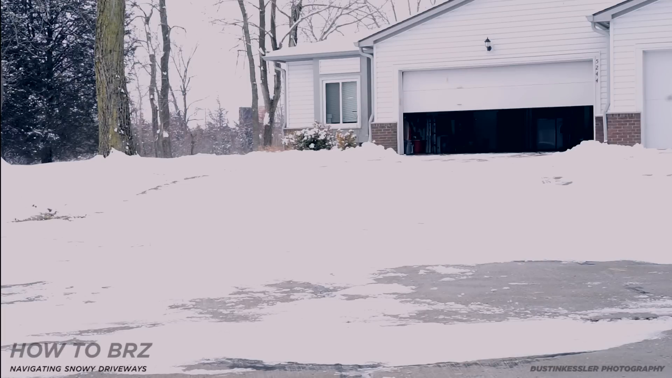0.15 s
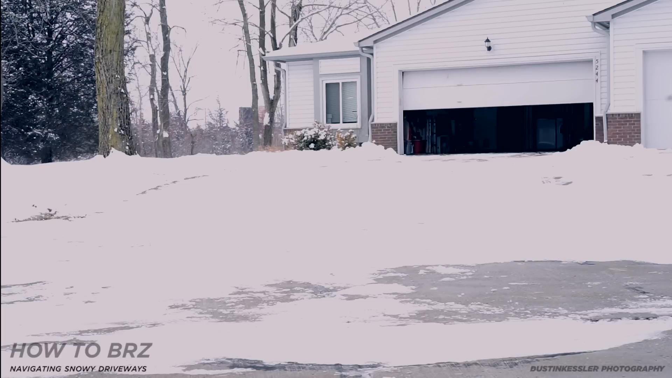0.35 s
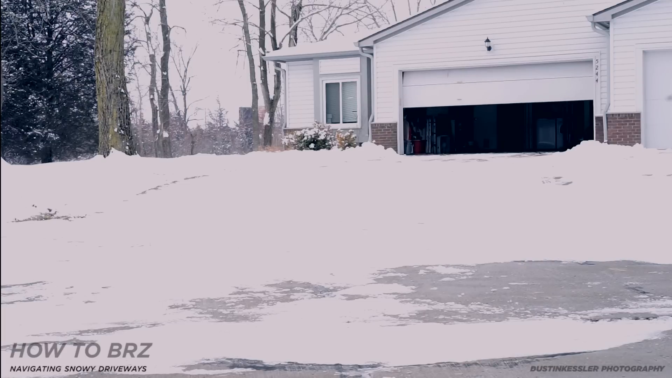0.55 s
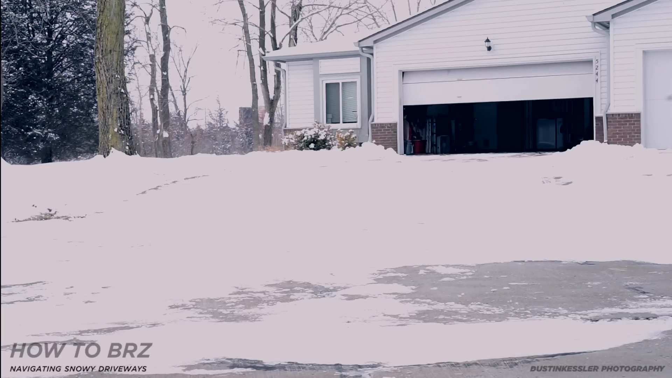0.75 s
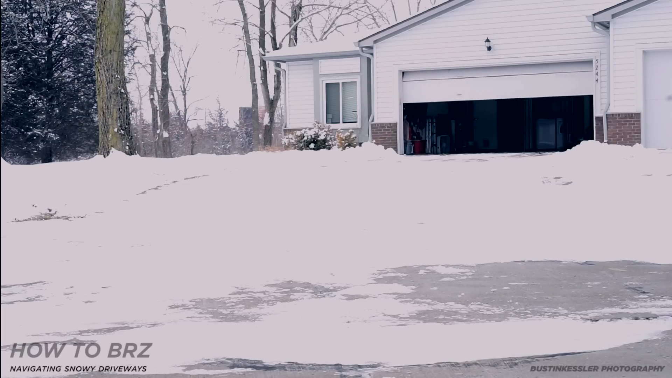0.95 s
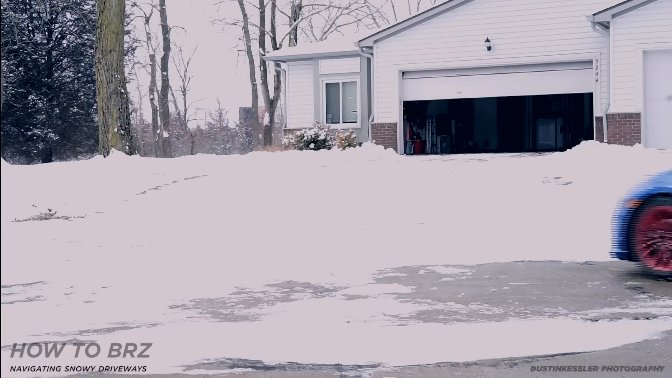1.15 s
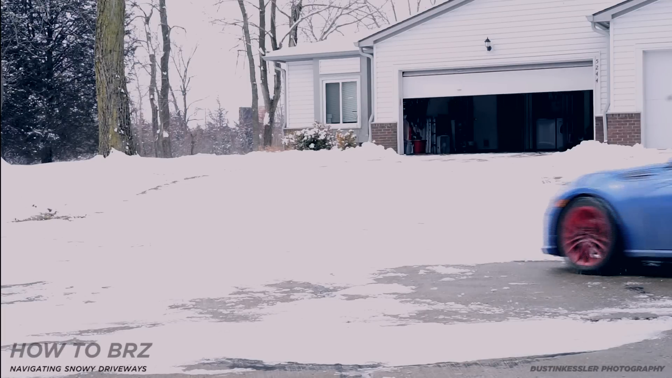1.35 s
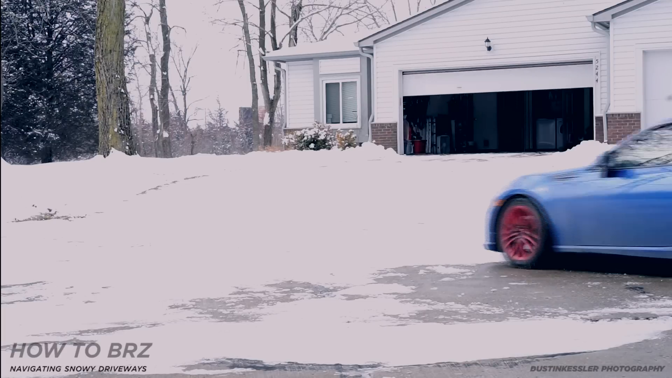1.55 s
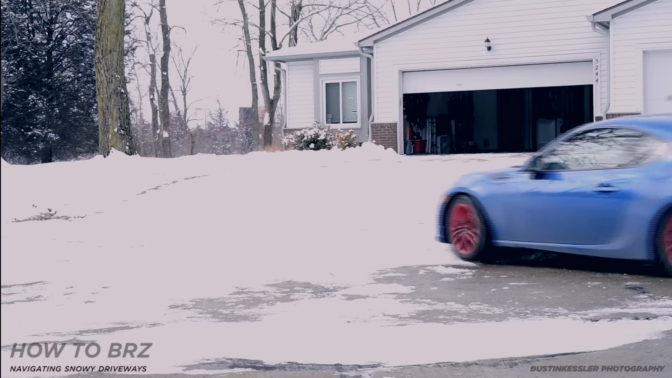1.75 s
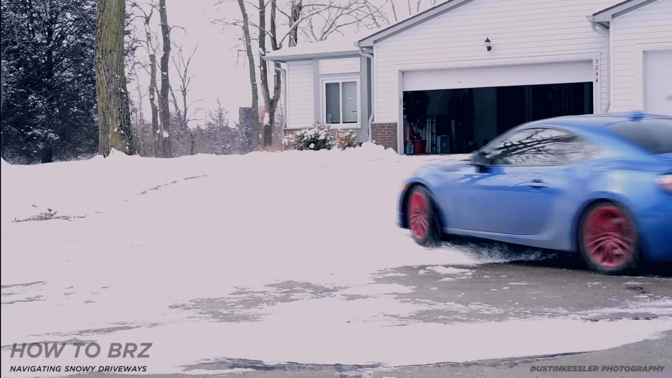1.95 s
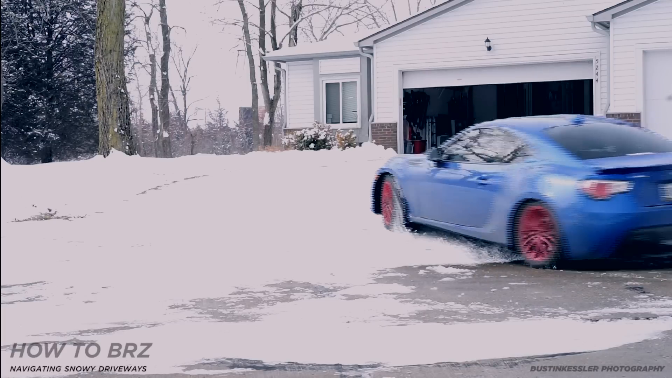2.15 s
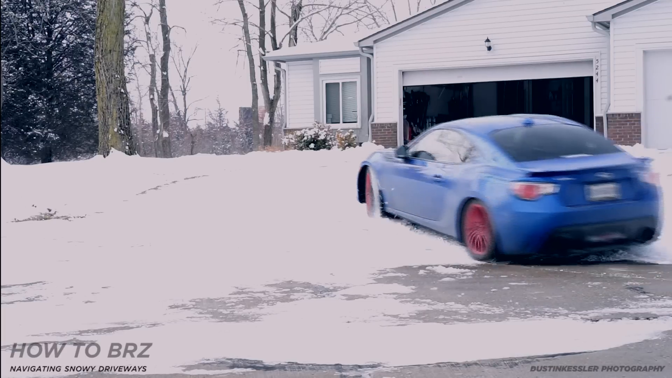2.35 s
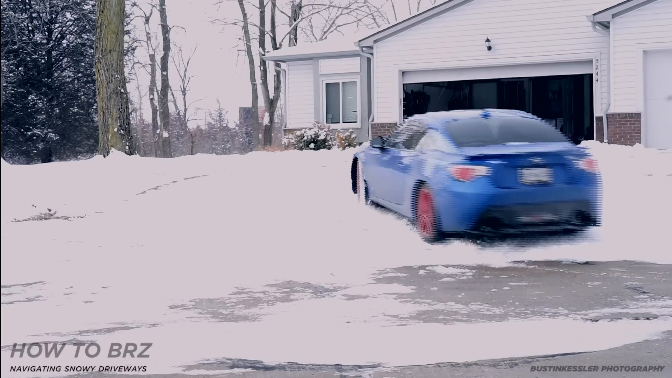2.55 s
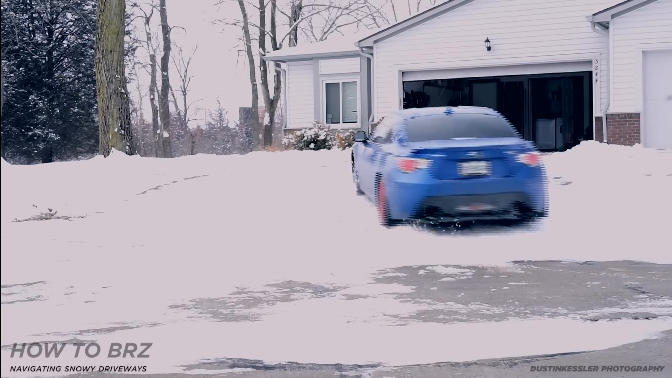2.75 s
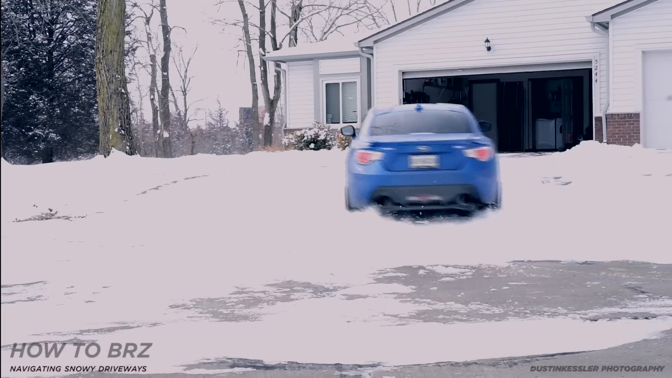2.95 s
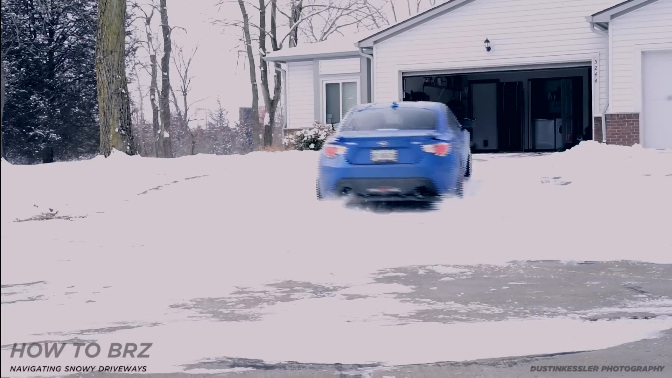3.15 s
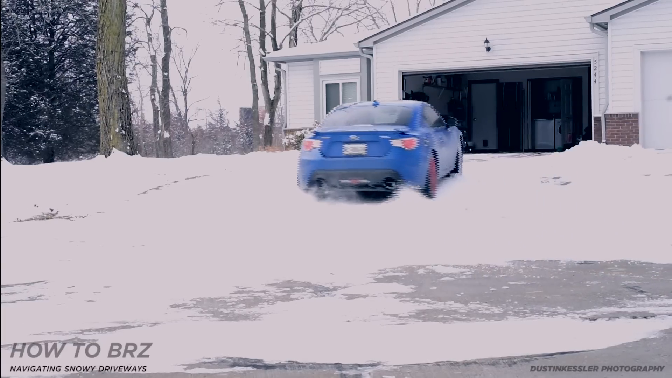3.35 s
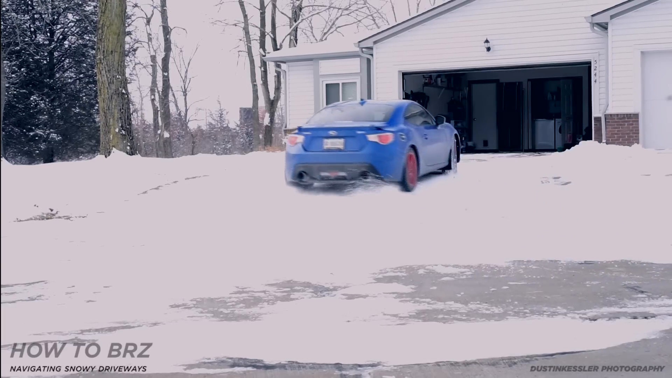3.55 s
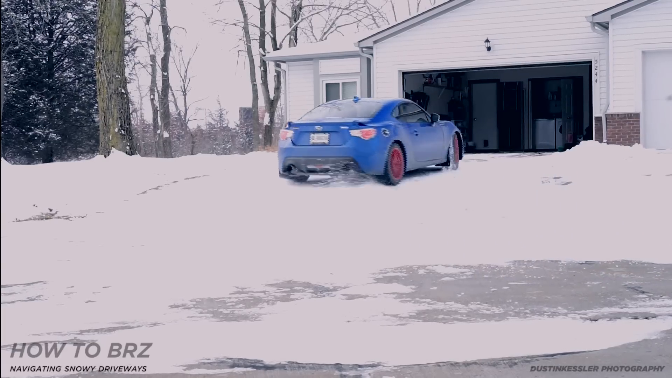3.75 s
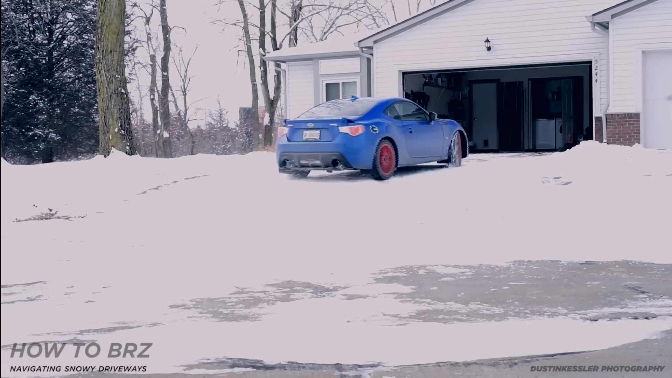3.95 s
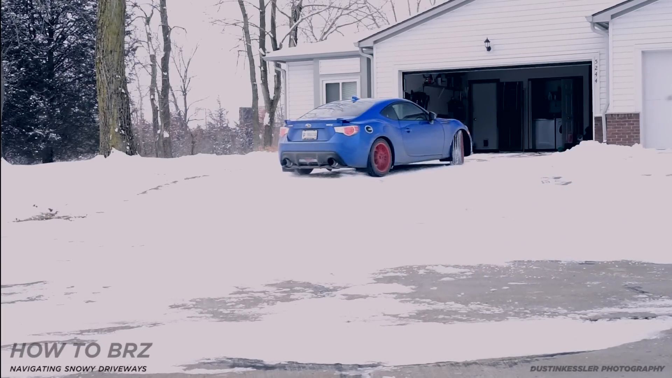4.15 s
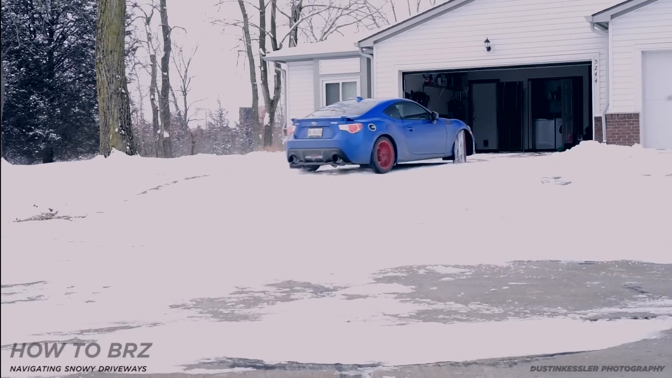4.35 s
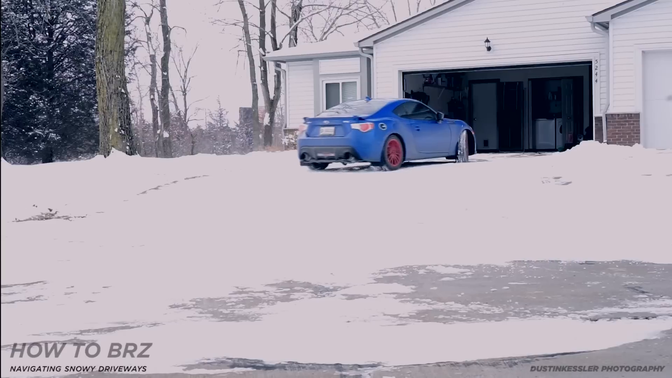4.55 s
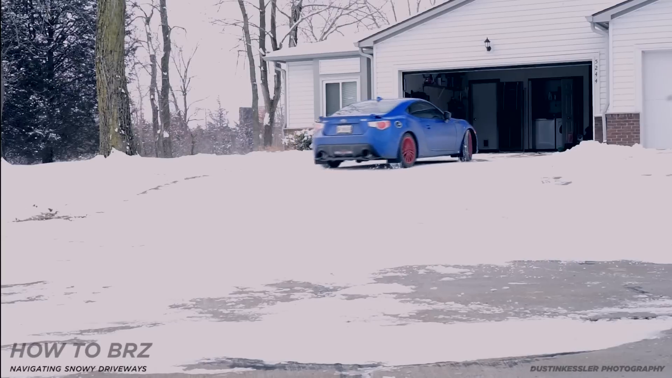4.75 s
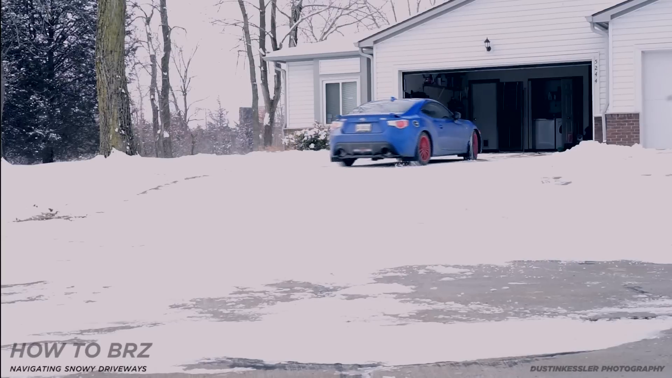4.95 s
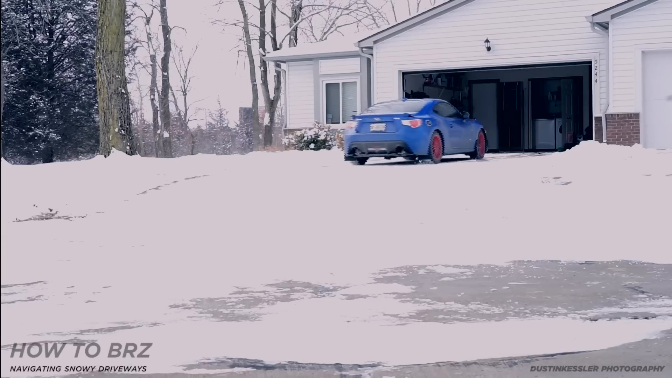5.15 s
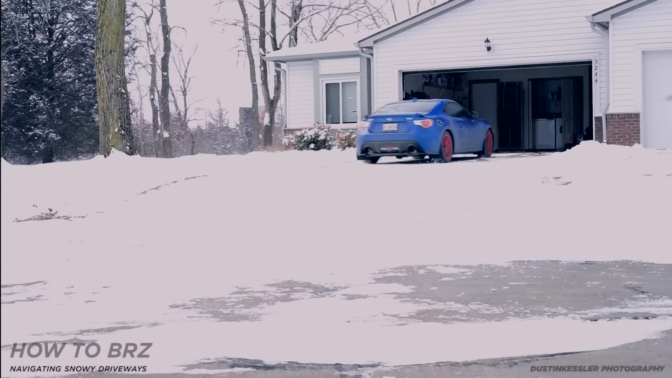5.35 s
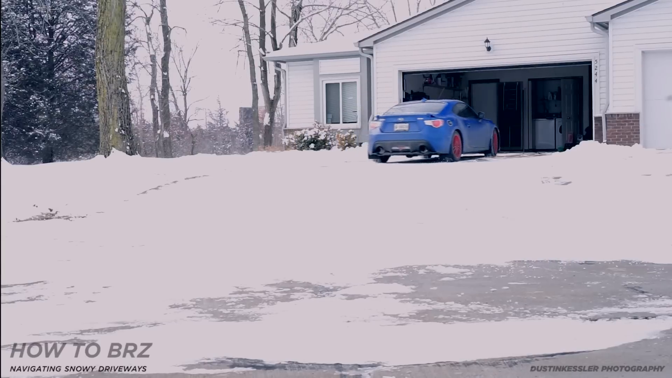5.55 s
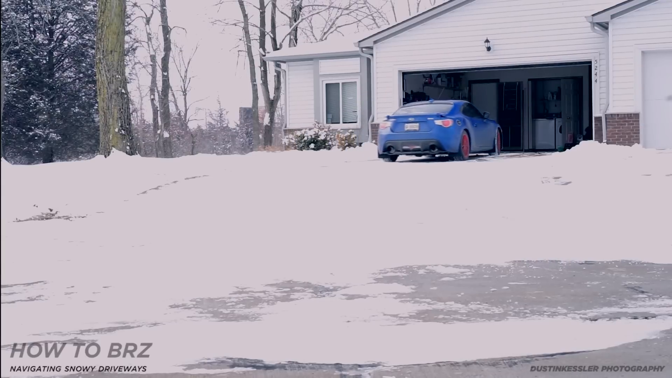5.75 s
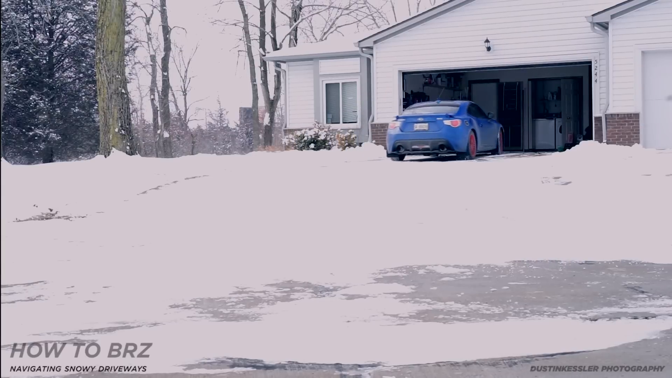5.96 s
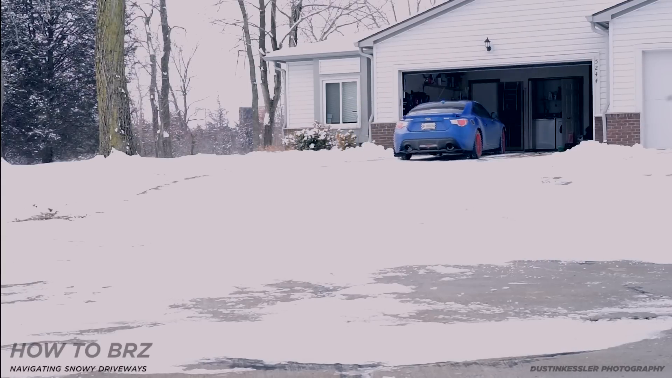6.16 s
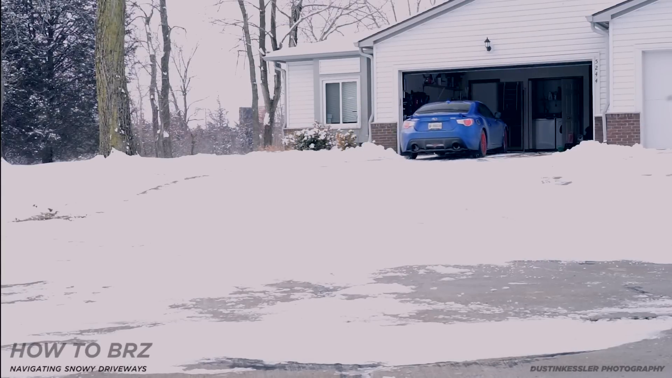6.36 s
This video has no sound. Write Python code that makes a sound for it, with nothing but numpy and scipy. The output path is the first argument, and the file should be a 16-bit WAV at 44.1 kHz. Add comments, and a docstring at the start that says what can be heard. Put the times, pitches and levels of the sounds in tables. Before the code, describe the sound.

Tyres crackle through snow under a low engine note that surges up, snarls, slides down and fades to a quiet distant drone outdoors.

```python
"""Tyres crunch on packed snow under a low exhaust drone: a flat-four sports car rolls in from the right,
revs up as it slides up a snowy driveway, then settles to a low drone.
The exhaust is sines on quarters of the firing rate; gas, tyres, snow, wind and air are filtered noise.
Snow cracks are decaying knocks, bird chips upward whistles; a far wall echoes the exhaust for a while.
A stereo camera microphone in the open hears it all."""
import sys
import numpy as np
from scipy import signal
from scipy.fft import rfft, irfft, next_fast_len
from scipy.io import wavfile
from scipy.ndimage import uniform_filter1d, map_coordinates

SR = 44100
rng = np.random.default_rng(int(sys.argv[2]) if len(sys.argv) > 2 else 0)


def waveform_to_disk(signal):
    """Save audio, clipped to [-1, 1], as 16-bit WAV at the path in sys.argv[1]."""
    frames = np.transpose(np.atleast_2d(signal))
    scaled = np.clip(frames, -1, 1) * 32767
    samples = np.round(scaled).astype(np.int16)
    wavfile.write(sys.argv[1], SR, samples)


N = 282681

# steady rolling noise before patches: time_s, crunch_db, scuff_db, thrown_snow_db, fine_spray_db
TYRE_LEVELS = [(0, -42, -41.5, -46, -63), (1.2, -37, -42, -45, -53), (1.96, -42, -44.5, -49.5, -57.5),
               (2.6, -39.5, -50, -49.5, -61), (3.4, -46, -45, -48.5, -69), (3.96, -48, -46.5, -54, -73.5),
               (4.1, -54.5, -49.5, -56, -71), (4.6, -50, -61, -65, -72.5), (6.41, -47, -64.5, -83, -69)]
# patches of deeper snow: peak_s, rise_s, fall_s, crunch_lift_db, scuff_lift_db, snow_and_spray_lift_db
SNOW_PATCHES = [(0.3, 0.073, 0.082, 7.5, -6, 6.5), (0.65, 0.22, 0.064, 9, 2.5, 12),
                (1.0, 0.027, 0.044, 6, 5.5, 4), (1.34, 0.17, 0.067, 7, 3, 7.5),
                (1.86, 0.34, 0.11, 4.5, 3, 9), (2.34, .015, 0.1, 0, 9, 15), (3.41, 0.017, 0.049, 10, -1, 0),
                (3.66, .03, 0.045, 4, 7, -2), (3.92, 0.069, 0.094, 4, 6, 5)]


def undb(db):
    """Amplitude ratio of a level in dB."""
    return 10 ** (np.asarray(db) / 20)


def curves(table):
    """Columns after the time column, one value per sample."""
    s, *columns = np.transpose(table)
    return [np.interp(np.arange(N) / SR, s, c) for c in columns]


def on_log(hz, table, column=1):
    """Table value at hz, straight lines on a log-frequency axis."""
    table = np.array(table, float)
    return np.interp(np.log(np.maximum(hz, 1)), np.log(table[:, 0]), table[:, column])


def swells(rows):
    """Summed triangular lifts in dB, one track per lift column after peak_s, rise_s, fall_s."""
    t = np.arange(N) / SR
    total = 0
    for s, rise_s, fall_s, *db in rows:
        triangle = np.interp(t, [s - rise_s, s, s + fall_s], [0, 1, 0])
        total = total + np.outer(db, triangle)
    return total


def walk(rate_hz):
    """Random levels held 1 / rate_hz and slewed twice; spread near 1."""
    k = int(SR / rate_hz)
    held = np.repeat(rng.standard_normal(N // k + 1), k)
    return 2.0 * uniform_filter1d(uniform_filter1d(held, k), k)[:N]


def band(x, lo_hz, hi_hz, order=2):
    """Band-pass, scaled to rms 1."""
    sos = signal.butter(order, [lo_hz, min(hi_hz, .45 * SR)], "band", fs=SR, output="sos")
    y = signal.sosfilt(sos, x)
    return y / np.sqrt(np.mean(y ** 2))


def noise_band(lo_hz, hi_hz, order=2):
    """White noise in a band, rms 1."""
    return band(rng.standard_normal(N), lo_hz, hi_hz, order)


def high_pass(order, hz):
    """Butterworth high-pass sections."""
    return signal.butter(order, hz, "high", fs=SR, output="sos")


def ports(make, spread=1):
    """Stereo from two draws of a noise: ports share bass, differ in treble, more with spread."""
    likeness = [(300, .999), (1400, 0.93), (3100, 0.74), (6800, 0.3), (15000, 0.1)]  # frequency_hz, share_0_to_1 at spread 1
    size = next_fast_len(N, real=True)
    like = np.clip(on_log(np.fft.rfftfreq(size, 1 / SR), likeness), 0, 1) ** spread
    mid = rfft(make(), size) * np.sqrt((1 + like) / 2)
    side = rfft(make(), size) * np.sqrt((1 - like) / 2)
    return np.array([irfft(mid + side, size), irfft(mid - side, size)])[:, :N]


def grit(per_s, spread_db):
    """Dense clicks of very uneven size over a hiss."""
    sizes = undb(spread_db * rng.exponential(size=N)) * rng.standard_normal(N)
    clicks = (rng.random(N) < per_s / SR) * sizes
    return clicks + 0.41 * rng.standard_normal(N)


def tyres():
    """Snow crunches and scuffs under the tyres: band-passed grit with a wavering level."""
    # time_s, depth_db: deeper part of the crunch against its brighter part
    crunch_depth = [(0, -6.5), (2.6, -12), (3.4, 5), (4.3, 4), (5.0, -22)]
    crunch_db, scuff_db = curves(TYRE_LEVELS)[:2] + swells(SNOW_PATCHES)[:2]
    depth_db, = curves(crunch_depth)

    def draw():
        bright = band(grit(4000, 1.82), 658, 1460)
        deep = undb(depth_db) * band(grit(2000, 1.9), 600, 1050)
        scuff = undb(scuff_db) * band(grit(4000, 2.0), 1500, 2910)
        return undb(1.0 * walk(24.87)) * (undb(crunch_db) * (bright + deep) + scuff)

    return ports(draw)


def thrown_snow():
    """Loose snow and fine spray hiss as they fly: higher bands of grit with a wavering level."""
    snow_db, spray_db = curves(TYRE_LEVELS)[2:] + swells(SNOW_PATCHES)[2]

    def draw():
        snow = undb(snow_db) * band(grit(6000, 1.8), 2700, 5300, order=1)
        spray = undb(spray_db) * band(grit(6000, 1.8), 5900, 12000)
        return undb(0.91 * walk(29.85)) * (snow + spray)

    return ports(draw)


def exhaust(half_tilt_db=-2.0, weak_tilt_db=-5.0, muffler_hz=240, muffle_db=25):
    """Sines on quarters of the firing rate; returns the tone and the firing phase in radians."""
    # time_s, firing_rate_hz
    revs = [(0, 49.48), (0.77, 54.53), (1.34, 58.76), (1.61, 61.37), (1.78, 75.23), (2.0, 101.4),
            (2.12, 117.4), (2.28, 137.6), (2.39, 136.9), (2.55, 149.6), (2.71, 170.5), (2.77, 174.9),
            (2.91, 187.9), (3.05, 193.1), (3.14, 192.9), (3.28, 179), (3.8, 121.3), (4.1, 93.9),
            (4.37, 68.55), (4.78, 47.96), (5.09, 39.05), (5.52, 42.28), (6.18, 36.54), (6.41, 37.25)]
    # base levels: time_s, firing_line_db, second_multiple_db, bark_of_higher_multiples_db
    # the bark is loud while the throttle is open
    line_levels = [(0, -21.5, -12.5, -36), (0.7, -20.5, -26, -35.5), (1.4, -21, -20.5, -35),
                   (1.75, -11, -14, -24), (2.0, -5.5, -26.5, -17.5), (2.12, -7.5, -39.5, -17),
                   (2.28, -7.5, -16, -17.5), (2.44, -12.5, -21, -19.5), (2.6, -5.5, -33, -26.5),
                   (2.68, -9, -39, -28.5), (2.8, -7.5, -28, -13.5), (3.05, -12, -30, -17),
                   (3.14, -21, -60, -34.5), (3.27, -9, -27, -35.5), (3.5, -7, -27, -40.5),
                   (3.75, -7.5, -30.5, -40), (4.08, -11, -37, -38.5), (4.19, -19, -42, -55),
                   (4.27, -25, -27, -45), (4.4, -25, -27, -33.5), (4.78, -30, -23.5, -39.5),
                   (5.09, -46, -40, -34.5), (5.52, -34.5, -27.5, -29), (6.41, -42, -48, -31)]
    # colour of the higher and in-between lines: frequency_hz, gain_db
    tailpipe = [(30, -33.5), (60, -17), (120, 1), (210, -2.5), (270, -5), (400, -7.5), (600, -3),
                (800, -11), (1000, -25.5), (1500, -45)]
    # base levels: time_s, uneven_bank_lines_db, weak_cylinder_lines_db
    uneven = [(0, -52, -53), (1.6, -54, -41), (2.1, -25.5, -25), (2.4, -23.5, -31.5), (2.7, -19, -21.5),
              (3.1, -20.5, -25), (3.25, -20.5, -24), (3.5, -21.5, -23), (3.8, -31.5, -32.5),
              (4.2, -45, -39.5), (6.41, -52, -36)]
    # the weak cylinder stumbles: peak_s, half_length_s, lift_db
    burbles = [(1.827, .08, 19), (2.02, .04, 16), (2.653, 0.046, 11), (3.273, 0.05, 9), (3.43, .04, 9.5)]
    # bark slope from the third multiple up: time_s, db_per_multiple
    bark_slope = [(0, -0.5), (1.8, -4), (2.15, -2), (2.65, 2), (2.75, -5), (3.3, -0.5), (3.6, 3), (4.4, -5),
                  (6.41, -5)]
    hollow_hz, hollow_octaves, hollow_db = 166.6, 0.092, -7  # the pipe goes quiet at this pitch
    rasp_db = -9  # half lines of the bark, below it
    idle_calm = 0.53  # share of the waver that dies away at low revs
    waver_db, upper_waver_db, rough_db = .9, 2., 1.2

    hz, = curves(revs)
    *first_db, bark_db = curves(line_levels)
    slope_db, = curves(bark_slope)
    half_db, weak_db = curves(uneven)
    weak_db = weak_db + swells([(s, half, half, db) for s, half, db in burbles])[0]
    turn = 2 * np.pi * np.cumsum(hz) / SR
    gentle = np.clip((75 - hz) / 25, 0, 1)  # 1 at low revs: the muffler swallows what is above its drone
    tone = 0
    for quarter in range(2, 37):
        k = quarter / 4
        muffled = gentle * np.clip(np.log2(k * hz / muffler_hz) / 0.12, 0, 1)
        colour = on_log(k * hz, tailpipe) - muffle_db * muffled
        if k in (1, 2):
            db = first_db[int(k) - 1]
        elif quarter % 4 == 0:
            db = bark_db + colour + slope_db * (k - 3)
        elif quarter % 2 == 0:  # the two banks differ
            low_half_db = half_db + half_tilt_db * k
            high_half_db = bark_db + rasp_db + slope_db * (k - 3)
            db = colour + (low_half_db if k < 3 else high_half_db)
        else:  # one cylinder in four is weaker
            db = weak_db + colour + weak_tilt_db * k
        if k > 4 and quarter % 2 == 0:  # the muffler drones just under its cut
            db = db + 3.4 * gentle * np.exp(-(np.log2(k * hz / 200) / 0.11) ** 2)
        db = db + hollow_db * np.exp(-(np.log2(k * hz / hollow_hz) / hollow_octaves) ** 2)
        waver = waver_db * walk(20) if k in (1, 2, 3, 4) else upper_waver_db * walk(12)
        flutter = (k > 2) * rough_db * walk(60)
        db = db + (waver + flutter) * (1 - idle_calm * gentle)
        tone = tone + np.sqrt(2) * undb(db) * np.sin(k * turn + rng.uniform(0, 2 * np.pi))
    return tone, turn


def exhaust_gas(turn):
    """Rumble and gas rush: noise puffing once a firing."""
    # time_s, rumble_db, gas_rush_db (heard 7.5 dB lower)
    gas_levels = [(0, -36, -38), (1.3, -31.5, -37.5), (1.86, -28.5, -21.5), (2.07, -38, -23.5),
                  (2.35, -35, -15), (2.9, -38, -23.5), (3.21, -32.5, -31), (3.4, -38.5, -26.5),
                  (3.96, -35.5, -32.5), (4.2, -45.5, -35.5), (6.41, -45, -57)]
    rumble_db, rush_db = curves(gas_levels)
    puff = 1 + 0.37 * np.cos(turn)

    def draw():
        rumble = undb(rumble_db) * noise_band(69, 358.0)
        rush = undb(rush_db - 7.5) * noise_band(260, 652)
        return puff * (rumble + rush)

    return ports(draw)


def air():
    """Far traffic and microphone hiss: shaped noise, shared in the bass, nearly unlike in the treble."""
    air_colour = [(15, -35.5), (25, -21.5), (66, 7), (129, -1.5), (188, -11), (274, -18.5), (523, -21),
                  (1170, -15.5), (3630, -36.5), (15500, -52.5)]  # frequency_hz, relative_level_db
    level_db = -36
    size = next_fast_len(N, real=True)
    gain = undb(on_log(np.fft.rfftfreq(size, 1 / SR), air_colour))

    def draw():
        return irfft(rfft(rng.standard_normal(size)) * gain, size)[:N]

    out = ports(draw, spread=6.3)
    return out * undb(level_db + 1.0 * walk(4.0)) / np.sqrt(np.mean(out ** 2))


def breeze(left_db=-9):
    """Wind buffets each port in short low puffs, the right one more."""
    wind = [(0, -35), (2.3, -42), (3.1, -63), (3.7, -35), (5.9, -36), (6.41, -34)]  # time_s, right_port_db before puffs
    wind_db, = curves(wind)
    puffs = []
    for port_db in (left_db, 0):
        puff_db = 6.4 * np.tanh(walk(11.0))
        puffs.append(undb(port_db + wind_db + puff_db) * noise_band(32, 120, order=3))
    return np.array(puffs)


def cracks(knock_s=0.0031, snap_s=0.0048):
    """Packed snow cracks under the tyres: a decaying hollow knock with a bright noise snap."""
    # start_s, knock_peak_db before decay and grain, knock_hz, snap_db before 1.34x gain
    crack_events = [(0.285, -16, 1100, -39), (0.316, -20, 1040, -35), (0.393, -20.5, 1110, -35),
                    (0.432, -19.5, 860, -53), (0.446, -14, 740, -51), (0.497, -26, 900, -47),
                    (0.54, -25, 990, -51), (0.617, -19.5, 750, -46), (0.689, -22.5, 1310, -49),
                    (0.99, -35, 1205, -46), (1.225, -23, 1020, -51), (1.264, -23, 1060, -50),
                    (1.286, -22, 1100, -49), (1.319, -22, 900, -45), (1.744, -23, 1060, -29.5),
                    (2.272, -24, 993, -48.5), (2.339, -27, 1050, -33), (3.389, -29, 847, -65),
                    (3.862, -30, 2260, -45), (4.115, -32.5, 1096, -51)]
    low, high, t = np.zeros(N), np.zeros(N), np.arange(2000) / SR
    for s, db, knock_hz, snap_db in crack_events:
        i = int(s * SR)
        low[i:i + 2000] += undb(db) * np.exp(-t / knock_s) * np.sin(2 * np.pi * knock_hz * t)
        high[i:i + 2000] += undb(snap_db) * np.exp(-t / snap_s)
    grain = 1 + .5 * noise_band(200, 2100)  # grit roughens the knock
    return low * grain + ports(lambda: 1.34 * high * noise_band(3100, 7100))


def bird(start_hz=5500, rise_s=0.0058, octave_db=-32, pan_db=5.0, tail_db=-9, tail_s=0.026):
    """Quick upward whistles that level off; house and trees send back a scattered tail."""
    # time_s (2 ms after onset), level_db before pan and tail, top_hz, length_s
    chips = [(0.355, -39.5, 8060, 0.016), (1.295, -42, 8050, 0.016), (2.0717, -53, 7990, 0.021),
             (2.977, -49.5, 8045, 0.019), (4.6936, -38.5, 8180, 0.015), (5.5598, -33, 8010, 0.018)]
    dry_chips = np.zeros(N)
    for s, db, top_hz, length_s in chips:
        t = np.arange(int(length_s * SR)) / SR
        hz = top_hz - (top_hz - start_hz) * np.exp(-t / rise_s)
        turn = 2 * np.pi * np.cumsum(hz) / SR
        shape = np.clip(t / 0.00099, 0, 1) * np.clip((length_s - t) / 0.0086, 0, 1)
        whistle = np.sin(turn) + undb(octave_db) * np.sin(2 * turn)
        i = int((s - .002) * SR)
        dry_chips[i:i + len(t)] += undb(db) * shape * whistle
    t = np.arange(SR // 4) / SR
    echo = rng.standard_normal((2, len(t))) * np.exp(-t / tail_s) * (t > .003)
    echo *= undb(tail_db) / np.sqrt(np.sum(echo ** 2, axis=1, keepdims=True))
    echo[:, 0] = undb([pan_db / 2, -pan_db / 2])  # direct sound
    echo[:, int(.004 * SR)] += .4  # bounce off a near surface
    return signal.fftconvolve(dry_chips[None], echo, axes=1)[:, :N]


def wall_echo(tone):
    """Exhaust echo off a distant wall, later as the car draws away."""
    wall_delay = [(3.91, 99.1), (4.02, 99.4), (4.175, 104.4), (4.48, 106.9), (4.75, 115.4), (5.1, 125)]  # time_s, delay_ms
    from_s, until_s, ramp_s = 3.72, 4.98, 0.25
    low_hz, level_db = 78, -6
    late_ms, = curves(wall_delay)
    echo = map_coordinates(tone, [np.arange(N) - late_ms * SR / 1000], order=1)
    echo = signal.sosfiltfilt(high_pass(2, low_hz), echo)  # wall too small for the deepest notes
    t = np.arange(N) / SR
    heard = np.clip(np.minimum(t - from_s, until_s - t) / ramp_s, 0, 1)
    return undb(level_db) * heard * echo


def at_ports(car):
    """The left port hears the car late; the camera body dulls it there and brightens the right port."""
    bearing = [(0, .1), (1.2, 0.069), (2.2, 0.0049), (3.6, 0.0044), (6.41, .012)]  # time_s, left_port_delay_ms
    late_ms, = curves(bearing)
    shade = np.clip(0.14 + 4.5 * late_ms, 0, .9)  # more the further right the car is
    treble = signal.sosfilt(high_pass(1, 1800), car)
    left, right = car + shade * treble * np.array([[-1], [.7]])
    left = map_coordinates(left, [np.arange(N) - late_ms * SR / 1000], order=3, mode="nearest")
    return np.array([left, right])


def scene():
    """Car sources pass the shaded ports; bird, air and wind add directly."""
    tone, turn = exhaust()
    car = tone + wall_echo(tone) + exhaust_gas(turn) + tyres() + thrown_snow() + cracks()
    return at_ports(car) + air() + breeze() + bird()


def record(dry):
    """The camera rounds the loudest peaks and cuts the top."""
    knee, room, top_hz = .6, .3, 15750
    over = np.maximum(np.abs(dry) - knee, 0)
    rounded = dry - np.sign(dry) * (over - room * np.tanh(over / room))
    return signal.sosfilt(signal.ellip(10, .2, 80, top_hz, fs=SR, output="sos"), rounded)


dry = scene()
out = record(dry)
waveform_to_disk(out)
```